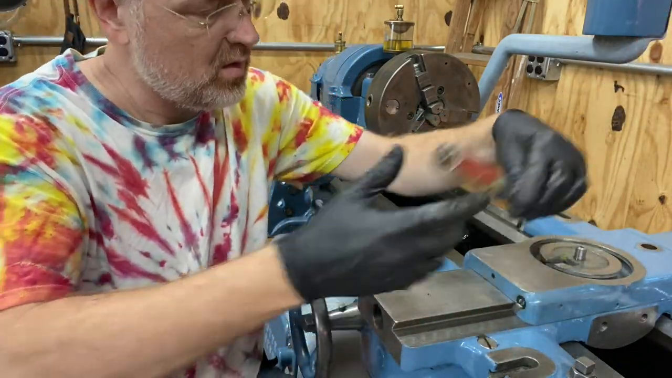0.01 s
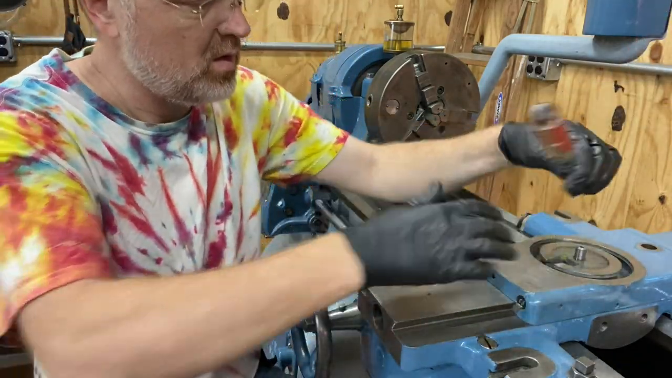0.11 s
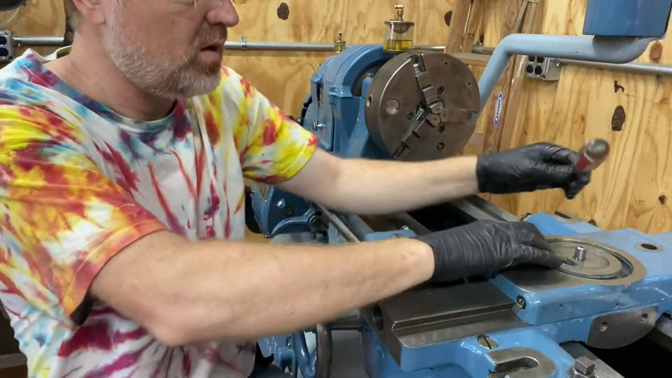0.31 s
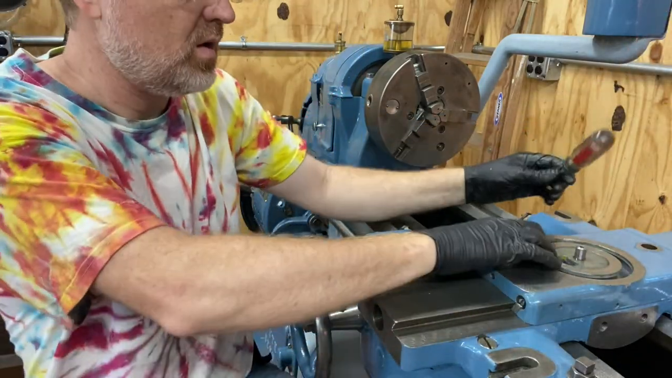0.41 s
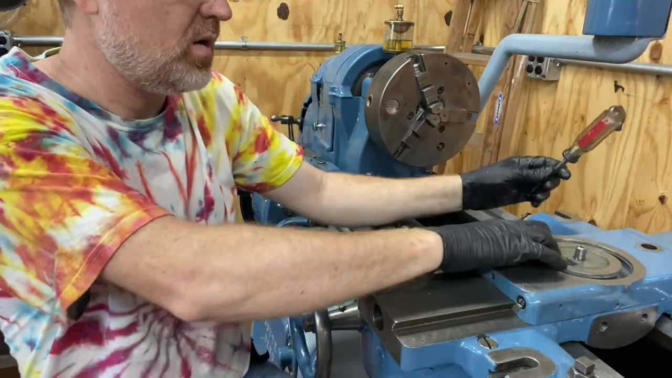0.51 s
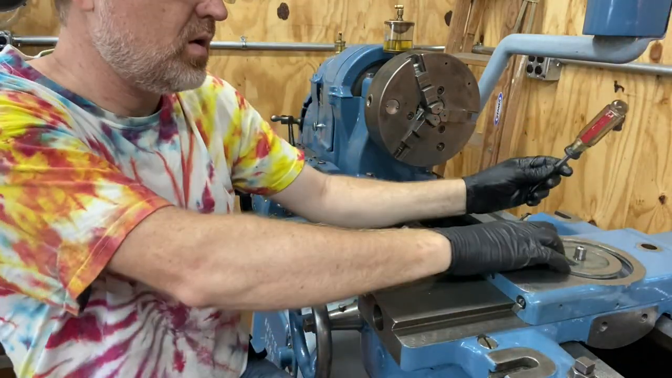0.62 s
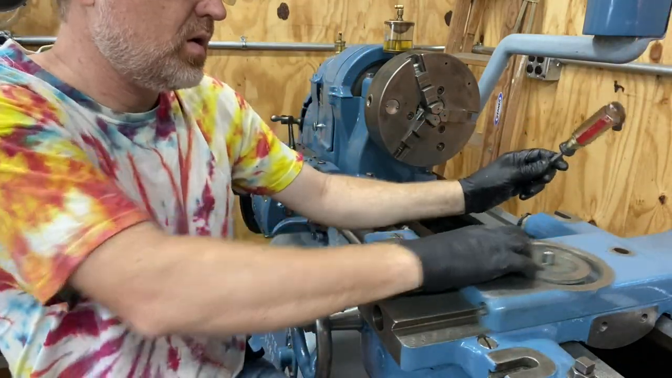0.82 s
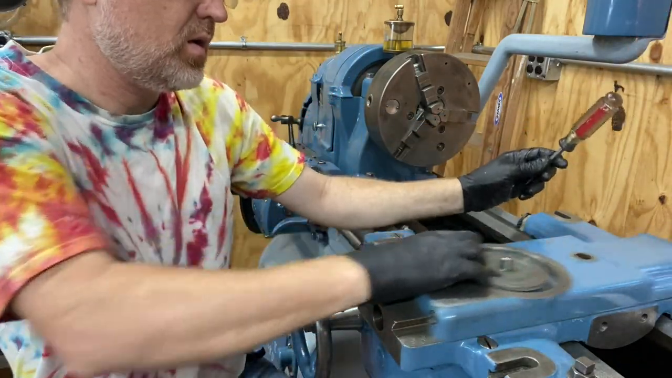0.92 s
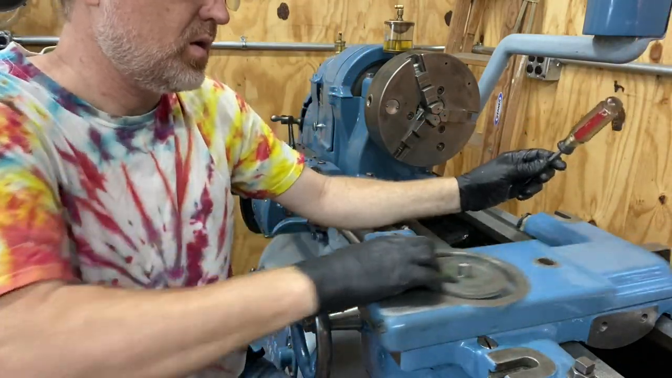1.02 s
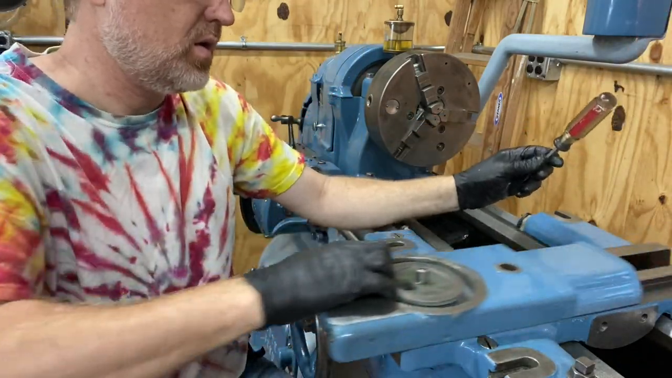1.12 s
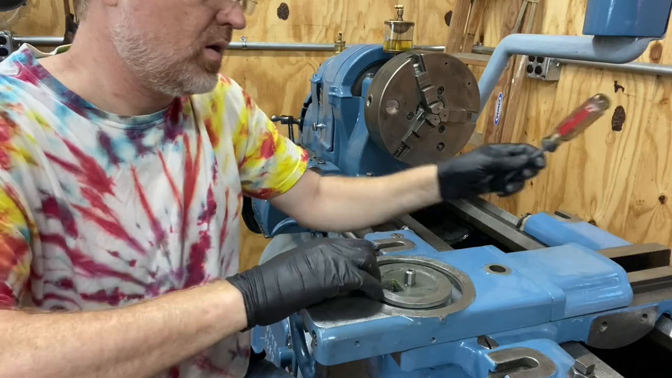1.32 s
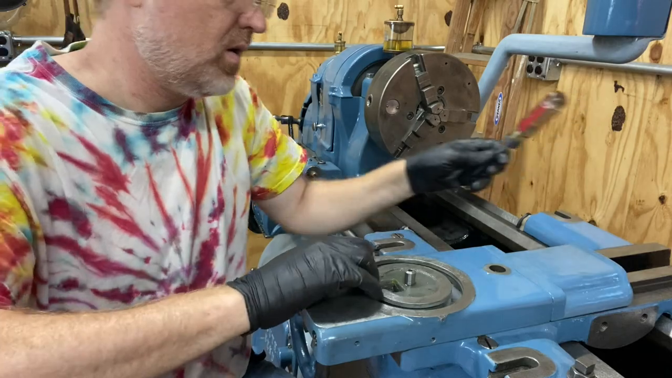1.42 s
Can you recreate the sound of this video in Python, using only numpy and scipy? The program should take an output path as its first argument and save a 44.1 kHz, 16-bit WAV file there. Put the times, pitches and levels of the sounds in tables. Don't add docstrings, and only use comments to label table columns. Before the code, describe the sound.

A heavy cast-iron machine slide clunks sharply against its stop, then scrapes back along its ways

```python
import sys
import numpy as np
from scipy import signal
from scipy.fft import rfft, irfft
from scipy.io import wavfile
from scipy.ndimage import uniform_filter1d

SR = 44100
rng = np.random.default_rng(int(sys.argv[2]) if len(sys.argv) > 2 else 0)


def wav_record(signal):
    frames = np.transpose(np.atleast_2d(signal))
    bounded = np.clip(frames, -1, 1)
    quanta = np.round(bounded * 32767).astype(np.int16)
    wavfile.write(sys.argv[1], SR, quanta)


def gain_from_db(level_db):
    decades = np.asarray(level_db, float) / 20
    return 10 ** decades


N = 66150

# (time [s], level [dB], contact time [ms], share of full ring [0-1])
KNOCKS = [(0.1739, -50, 0.34, 0.4), (0.1815, -45.5, 0.31, 0.86), (.2015, -48, 0.011, 0.6),
          (0.2438, -29, 0.023, 0.75), (0.2482, -17, 0.03, 0.42), (0.2541, -20.5, 0.079, 0.07),
          (0.263, -50, 0.06, 0.9), (.385, -38, 0.1, 0.77), (.400, -34, 0.0315, 0.64),
          (1.016, -40.5, 0.21, 0.78), (1.045, -38, 0.17, 0.05), (1.083, -42, 0.18, 1),
          (1.165, -41, .25, 0.4), (1.185, -55, 0.24, 0.02), (1.224, -49.5, 0.2, 0.44),
          (1.328, -95.5, 0.025, 0.36)]
# (frequency [Hz], level [dB], t60 [s])
IRON_MODES = [(585, -16, 0.081), (810, -9.5, 0.0078), (950, -28.5, 0.057), (1030, -4, 0.048),
              (1185, -17, 0.18), (1540, -46.5, 0.12), (1640, -11, 0.03), (1900, 9, 0.023),
              (2185, -3.5, 0.064), (2760, -5, 0.025), (3070, -12, 0.071), (4690, -16.5, 0.058)]
# (frequency [Hz], density [dB per Hz])
CLATTER_SPECTRUM = [(200, -7.5), (600, -3.5), (1200, -1.5), (2400, -5.5), (4000, -17.5), (8500, -10),
                    (12000, -15), (15500, -21)]
# (frequency [Hz], t60 [s])
CLATTER_T60 = [(300, 0.32), (1500, 0.23), (5000, 0.1), (15000, 0.013)]
# (time [s], level [dB], centre [Hz], width [Hz], t60 [s])
CRACKS = [(.1748, -43, 1150, 500, .14), (.1755, -60, 2550, 400, .08), (.179, -62, 8600, 1500, .02),
          (.2005, -58, 4000, 1200, .03), (.2425, -45, 7000, 4000, .03), (.2425, -40, 1700, 900, .04),
          (.2485, -33, 7500, 4000, .025), (.2490, -35, 4300, 1500, .09), (.2495, -26, 2200, 900, .08),
          (.255, -42, 6200, 3000, .15), (.26, -39, 3200, 1500, .3), (1.165, -43, 1200, 500, .08),
          (1.328, -64, 2800, 1800, .04)]
# (time [s], level [dB], pitch [Hz], rise [s], t60 [s])
BANGS = [(.2490, -25, 900, .002, .04), (.2490, -29, 770, .002, .05), (.2530, -23, 985, .002, .035),
         (.256, -29, 590, .003, .09), (.265, -33, 530, .004, .06), (.176, -49, 1000, .002, .07),
         (.175, -50, 800, .003, .08), (.4, -44, 990, .01, .07), (1.165, -47, 530, .004, .08),
         (.826, -62, 850, .01, .1), (1.165, -45, 840, .004, .09)]
# (time [s], level [dB], pitch [Hz], rise [s], t60 [s])
THUDS = [(0.178, -41, 344, 0.0044, 0.081), (0.192, -47.5, 138, 0.007, 0.98),
         (0.203, -61, 54.3, 0.016, 0.43), (0.257, -23.5, 125, 0.0088, 0.066),
         (.258, -30.5, 347.6, 0.0065, 0.14), (0.262, -32.5, 247, 0.0072, 0.086),
         (.295, -33.5, 244.3, .015, .1), (.285, -33, 190, 0.0062, 0.085),
         (.435, -38.5, 240.6, 0.024, 0.077), (.36, -38, 242.5, 0.027, .12), (0.278, -39.5, 59, 0.039, 0.32),
         (0.317, -44, 90.9, 0.0072, 0.81), (0.411, -32.5, 238.2, 0.029, 0.15),
         (0.413, -36.5, 145.5, 0.011, 0.17), (0.495, -50, 105, 0.0065, 0.11),
         (0.517, -47, 250.4, 0.01, 0.074), (.57, -54.5, 244, 0.01, .07), (.322, -37.5, 340, 0.0096, 0.1),
         (.395, -38, 345.5, 0.021, .08), (0.573, -53.5, 92.2, 0.026, 0.25), (0.79, -53, 100.6, 0.014, 0.24),
         (0.79, -56.5, 257, 0.013, 0.12), (1.016, -40.5, 318, 0.018, 0.075),
         (1.058, -42.5, 283, 0.0048, 0.054), (1.079, -48.5, 241.5, 0.0059, 0.38),
         (1.112, -48.5, 92, 0.021, 0.11), (1.166, -45.5, 415.8, 0.0074, 0.21),
         (1.187, -42, 112, 0.01, 0.076), (1.234, -45, 113.6, 0.0053, 0.17),
         (1.259, -48.5, 57.8, 0.025, 0.23), (1.409, -60, 97, 0.01, 0.091), (1.22, -53.5, 430, 0.0068, .05),
         (.59, -58, 47.6, 0.027, 0.32)]
# (time [s], level [dB])
DRAG = [
    (.63, -77.5),
    (.70, -53.5),
    (0.789, -47),
    (.88, -47.5),
    (.99, -44.5),
    (1.06, -44.5),
    (1.125, -51),
    (1.155, -51.5),
    (1.189, -87),
]
# (frequency [Hz], density [dB per Hz])
GRIT_SPECTRUM = [(200, -80.5), (500, -10.5), (900, -11), (2500, -10), (5000, -11.5), (8500, -8),
                 (12000, -14.5), (15500, -23)]
# (frequency [Hz], width [Hz], level [dB])
SLIDE_MODES = [(865, 18, 0), (1260, 160, 9), (1480, 17, 6.5), (1680, 270, 11.5), (2130, 260, 6.5),
               (2446, 52, -0.5), (3060, 23, -4), (3370, 150, -12), (4430, 97, -13.5)]
# (time [s], length [s], lift [dB], centre [Hz])
ROUGH_SPOTS = [
    (.822, .06, 6, 1200),
    (.915, .07, 6, 3000),
    (.98, .045, 6, 1200),
    (1.035, .055, 5, 1400),
    (1.09, .06, 4, 3200),
]
# (time [s], level [dB], centre [Hz],
# width [Hz], length [s])
CHATTER = [(.76, -54, 1500, 60, .04), (.822, -50, 850, 70, .045), (.828, -52, 2150, 70, .03),
           (.83, -51, 1300, 60, .04), (.845, -50, 1750, 80, .05), (.915, -48, 2450, 60, .04),
           (.92, -50, 1500, 70, .04), (.925, -53, 3700, 80, .05), (.935, -53, 4400, 70, .04),
           (.95, -50, 2000, 150, .025), (.988, -49, 2450, 60, .035), (.99, -46, 1300, 120, .04),
           (1.035, -45, 1300, 100, .05), (1.05, -47, 1750, 90, .04), (1.075, -47, 880, 80, .025),
           (1.088, -49, 1750, 70, .05), (1.10, -58, 4400, 150, .025), (.94, -54, 3000, 200, .04),
           (0, -68, 2600, 300, .045), (.04, -68, 3200, 300, .06), (.075, -70, 4000, 200, .05),
           (.115, -71, 3100, 300, .05)]
# (time [s], pitch [Hz], level [dB])
SQUEAK = [
    (1.29, 4090, -88),
    (1.33, 4230, -74),
    (1.415, 4200, -75),
    (1.43, 4080, -75),
    (1.5, 4020, -78),
]
# (time [s], length [s], level [dB])
RUSTLES = [
    (0.175, 0.019, -56.5),
    (0.208, 0.037, -43.5),
    (0.538, 0.089, -60.5),
    (1.198, 0.098, -58.5),
]
# (frequency [Hz], density [dB per Hz])
GLOVE_SPECTRUM = [(2500, -34), (5000, -10), (8000, 0.0), (15000, -3)]
# (frequency [Hz], t60 [s])
ROOM_T60 = [(100, 0.58), (400, 0.46), (1500, 0.5), (4000, 0.64), (8000, 0.3), (15000, 0.25)]
# (frequency [Hz], correlation [-1 to 1])
PORT_LIKENESS = [(60, 0.53), (250, 0.28), (600, 0.035), (3000, 0.11), (15000, 0.25)]
# (frequency [Hz], density [dB per Hz])
AIR_SPECTRUM = [(25, -16), (55, -0.5), (110, -14), (300, -17.5), (900, -25), (3000, -24.5), (5500, -29),
                (15000, -27.5)]
# (time [s], level [dB])
AIR_SWELL = [
    (0, 2),
    (0.121, -1),
    (1.3, 1),
    (1.5, -4),
]


def evened(x):
    return x / np.sqrt(np.mean(x ** 2) + 1e-20)


def read(points, hz):
    f, value = np.transpose(points)
    return np.interp(np.log(hz + 1), np.log(f + 1), value)


def add(mix, start_s, sound):
    part = mix[round(start_s * SR):][:len(sound)]
    part += sound[:len(part)]


def colour(x, points):
    gain = gain_from_db(read(points, np.fft.rfftfreq(x.shape[-1], 1 / SR)))
    return irfft(rfft(x) * gain, x.shape[-1])


def dying(x, t60):
    hz, t, z = signal.stft(x, SR, nperseg=256)
    return signal.istft(z * gain_from_db(-60 * t / t60(hz)[:, None]), SR, nperseg=256)[1]


def patchy(x, db):
    hz, t, z = signal.stft(x, SR, nperseg=1024)
    patches = uniform_filter1d(rng.standard_normal(z.shape[-2:]), 24, 0)
    patches = evened(uniform_filter1d(patches, 4, 1))
    return signal.istft(z * gain_from_db(db * patches), SR, nperseg=1024)[1][..., :N]


def resonate(x, hz, width_hz):
    turn = np.exp(2j * np.pi * np.cumsum(hz * np.ones(len(x))) / SR)
    r = np.exp(-np.pi * width_hz / SR)
    return 2 * (turn * signal.lfilter([1 - r], [1, -r], x / turn)).real


def band(hz, width_hz, length_s):
    settle = 2000
    noise = rng.standard_normal(round(SR / 4) + settle)
    narrow = resonate(resonate(noise, hz, width_hz), hz, width_hz)
    return evened(narrow[settle:])[:round(length_s * SR)]


def pair(a, b):
    same = np.clip(read(PORT_LIKENESS, np.fft.rfftfreq(a.shape[-1], 1 / SR)), -1, 1)
    other = same * rfft(a) + np.sqrt(1 - same ** 2) * rfft(b)
    return np.array([a, irfft(other, a.shape[-1])])


def knock(level_db, contact_ms, ring):
    t = np.arange(SR // 2) / SR
    modes = 0
    for hz, db, t60_s in IRON_MODES:
        fall = gain_from_db(db - 60 * t / (min(t60_s, .16) * ring))
        modes = modes + fall * np.sin(2 * np.pi * hz * t + rng.normal(0, 0.73))
    noise = colour(rng.standard_normal(len(t)), CLATTER_SPECTRUM)
    clatter = dying(noise, lambda hz: ring * read(CLATTER_T60, hz))[:len(t)]
    head = slice(0, 256)
    body = modes / modes[head].std() + clatter / clatter[head].std()
    u = t[:400] / (contact_ms / 1000)
    contact = u * np.exp(-u)
    soft = signal.oaconvolve(body * np.minimum(t / 0.00058, 1), contact)[:len(t)]
    return gain_from_db(level_db) * soft / soft[head].std()


def crack(level_db, hz, width_hz, t60_s):
    t = np.arange(SR // 5) / SR
    fall = gain_from_db(-60 * t / t60_s) * np.minimum(t / 0.00054, 1)
    return gain_from_db(level_db) * fall.std() * evened(fall * band(hz, width_hz, 1 / 5))


def thud(level_db, hz, rise_s, t60_s):
    t = np.arange(SR // 2) / SR
    waver = 1 + .03 * evened(uniform_filter1d(rng.standard_normal(len(t)), 600))
    rise = np.sin(np.pi / 2 * np.minimum(t / rise_s, 1)) ** 2
    fall = gain_from_db(-60 * np.maximum(t - rise_s, 0) / t60_s)
    return gain_from_db(level_db) * np.sqrt(2) * rise * fall * np.sin(2 * np.pi * np.cumsum(hz * waver) / SR)


def scrape():
    grit_per_s, grit_spread_db, jitter_db = 5000, 2, 1.2
    slide_db, slide_drift, patch_db = 5, .02, 2.0
    hiss_db, hiss_follow = -1, 0.7
    s, db = np.transpose(DRAG)
    t = np.arange(N) / SR
    jitter = evened(uniform_filter1d(rng.standard_normal(N), 900))
    drag_db = np.interp(t, s, db, left=-120, right=-120) + jitter_db * jitter
    size = gain_from_db(grit_spread_db * np.minimum(rng.exponential(1, N), 5))
    hits = rng.random(N) < grit_per_s / SR
    grit = size * hits * rng.choice([-1., 1.], N)
    ring = 0
    for hz, width_hz, level_db in SLIDE_MODES:
        phase, rate_hz = rng.uniform([0, 1], [1, 3])
        drift = 1 + slide_drift * np.sin(2 * np.pi * (rate_hz * t + phase))
        ring = ring + gain_from_db(level_db) * resonate(grit, hz * drift, width_hz) / np.sqrt(width_hz)
    top_db = db.max()
    moving = (t > s[0]) * (t < s[-1])
    hiss_level = gain_from_db(top_db + hiss_follow * (drag_db - top_db) + hiss_db)
    hiss = hiss_level * moving * evened(colour(grit, GRIT_SPECTRUM))
    return gain_from_db(drag_db + slide_db) * evened(patchy(ring, patch_db)) + hiss


def roughened(x):
    hz, t, z = signal.stft(x, SR, nperseg=512)
    lift_db = 0
    for s, length_s, db, centre_hz in ROUGH_SPOTS:
        passing = np.sin(np.pi * np.clip((t - s) / length_s, 0, 1) ** 0.13)
        octaves = np.log2((hz[:, None] + 1) / centre_hz)
        lift_db = lift_db + db * passing * np.exp(-(octaves / 0.56) ** 2)
    return signal.istft(z * gain_from_db(lift_db), SR, nperseg=512)[1][:N]


def chatter(level_db, hz, width_hz, length_s):
    note = band(hz, width_hz, length_s)
    return gain_from_db(level_db) * evened(np.sin(np.linspace(0, np.pi, len(note))) * note)


def squeak():
    s, hz, db = np.transpose(SQUEAK)
    t = np.arange(N) / SR
    pitch, level = evened(uniform_filter1d(rng.standard_normal((2, N)), 500))
    pitch_hz = np.interp(t, s, hz) + 25 * pitch
    level_db = np.interp(t, s, db, left=-140) + 2.2 * level
    return gain_from_db(level_db) * np.sqrt(2) * np.sin(2 * np.pi * np.cumsum(pitch_hz) / SR)


def rustle():
    t = np.arange(N) / SR
    swells = 0
    for s, length_s, db in RUSTLES:
        swells = swells + gain_from_db(db) * np.sin(np.pi * np.clip((t - s) / length_s, 0, 1) ** 1.2)
    return swells * evened(colour(rng.standard_normal(N), GLOVE_SPECTRUM))


def room(x):
    taps = np.zeros((2, SR))
    at = np.arange(120, SR - 20, 10) + rng.integers(0, 10, (2, (SR - 131) // 10))
    np.put_along_axis(taps, at, rng.choice([-1., 1.], at.shape), 1)
    z = rfft(pair(*dying(taps, lambda hz: read(ROOM_T60, hz))))
    power = abs(z) ** 2 + 1e-12
    flatten = np.sqrt(uniform_filter1d(power, size=2000) / uniform_filter1d(power, size=150))
    tail = irfft(z * flatten)[:, :SR * 3 // 4]
    tail = tail * (np.arange(tail.shape[1]) > 100)
    return signal.fftconvolve(x[None], tail / np.linalg.norm(tail[0]), axes=1)[:, :N]


def air():
    hush = patchy(pair(*colour(rng.standard_normal((2, N)), AIR_SPECTRUM)), 2.0)
    swell_db = np.interp(np.arange(N) / SR, *np.transpose(AIR_SWELL))
    return gain_from_db(-62.5 + swell_db) * evened(hush)


def scene():
    left_db, left_lag_samples = -7, 12
    iron_wet_db, slide_wet_db, stand_wet_db = -4.5, -11, -11
    slide = roughened(scrape())
    iron = squeak() + rustle()
    stand = np.zeros(N)
    for s, *row in KNOCKS:
        add(iron, s, knock(*row))
    for s, *row in CRACKS:
        add(iron, s, crack(*row))
    for s, *row in CHATTER:
        add(slide, s, chatter(*row))
    for s, *row in THUDS + BANGS:
        add(stand, s, thud(*row))
    near = iron + slide
    direct = np.array([gain_from_db(left_db) * np.roll(near, left_lag_samples), near])
    wet = gain_from_db(iron_wet_db) * iron + gain_from_db(slide_wet_db) * slide + gain_from_db(stand_wet_db) * stand
    return direct + stand + room(wet) + air()


def top_cut(x):
    return signal.sosfilt(signal.butter(12, 15700, fs=SR, output="sos"), x)


def record(dry):
    port_hz, port_width_hz, port_turn_hz = 6500, 500, 5200
    hz = np.fft.rfftfreq(N, 1 / SR)
    left, right = rfft(dry)
    share = np.pi / 2 * np.clip((hz - port_hz) / port_width_hz, 0, 1)
    late_left = left * np.exp(-2j * np.pi * hz / port_turn_hz)
    right = np.cos(share) * right - np.sin(share) * late_left
    return top_cut(irfft(np.array([left, right]), N))


dry = scene()
out = record(dry)
wav_record(out)
```